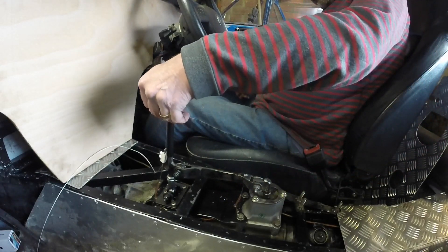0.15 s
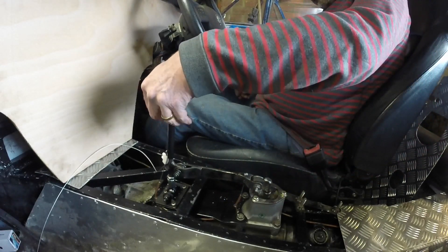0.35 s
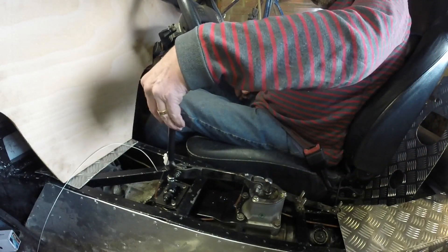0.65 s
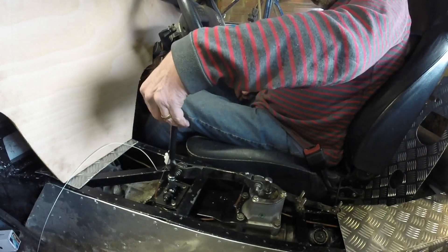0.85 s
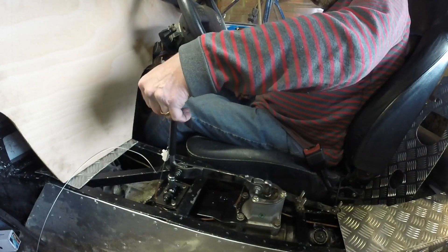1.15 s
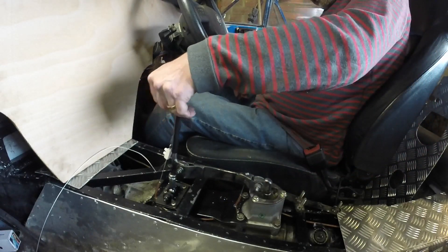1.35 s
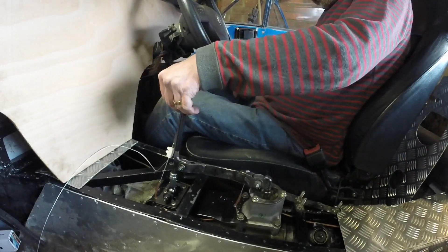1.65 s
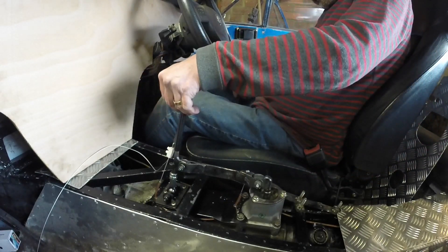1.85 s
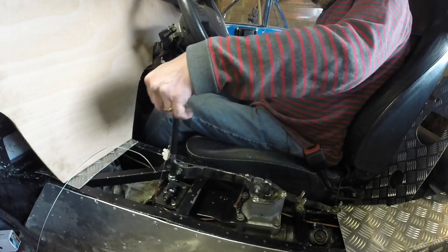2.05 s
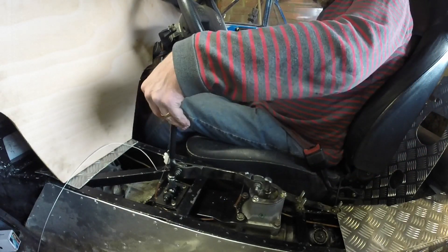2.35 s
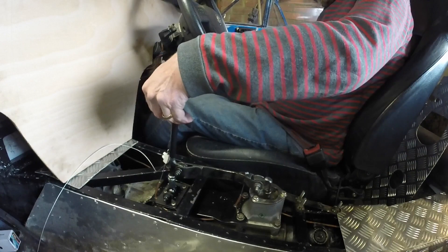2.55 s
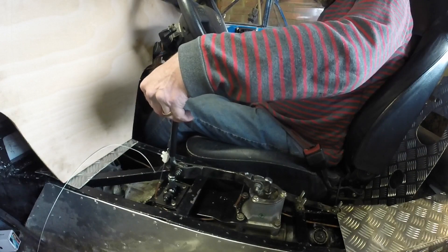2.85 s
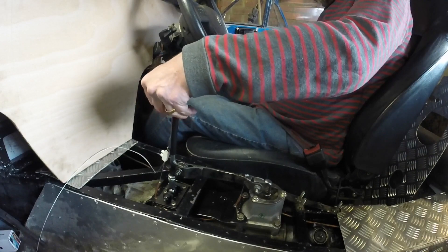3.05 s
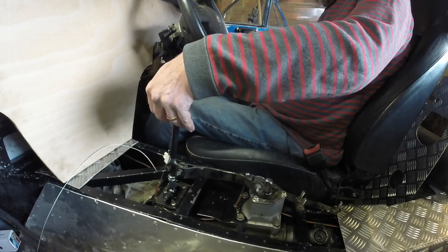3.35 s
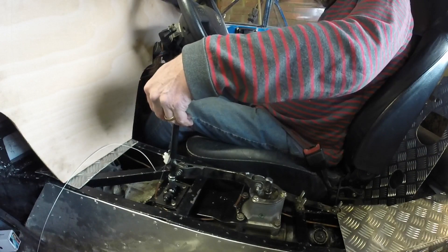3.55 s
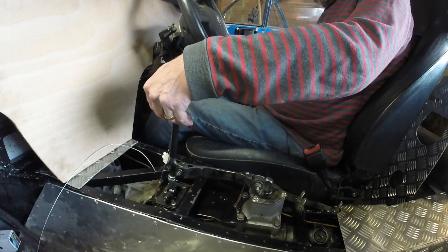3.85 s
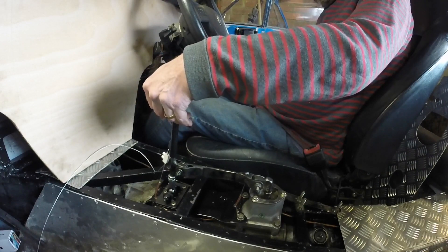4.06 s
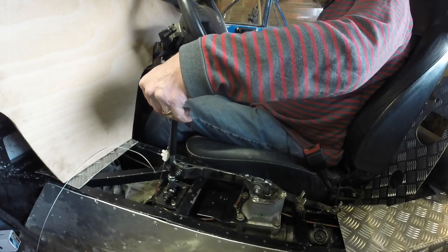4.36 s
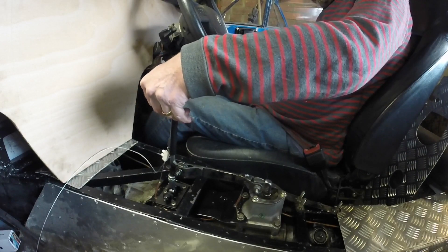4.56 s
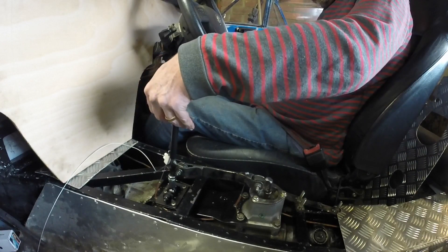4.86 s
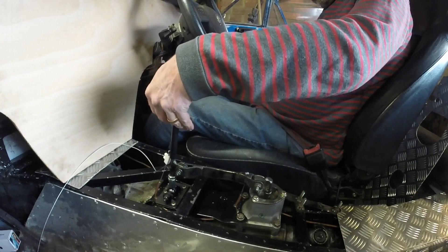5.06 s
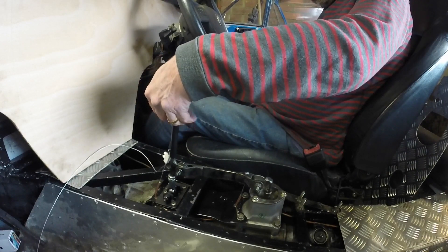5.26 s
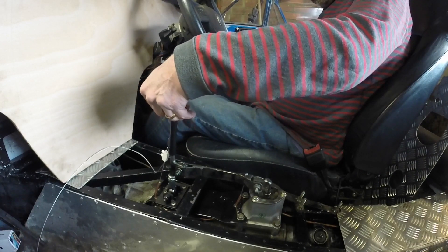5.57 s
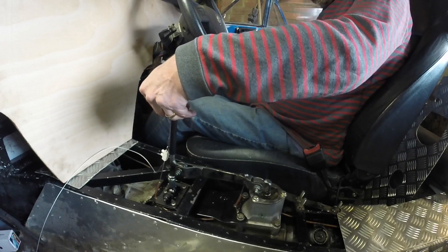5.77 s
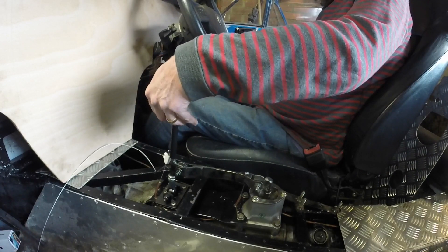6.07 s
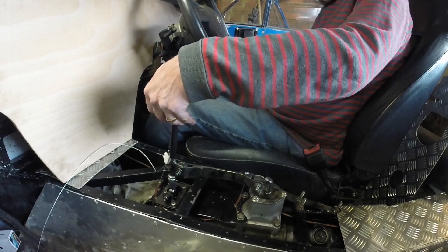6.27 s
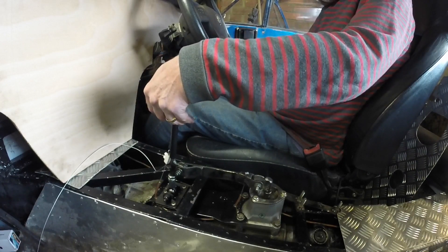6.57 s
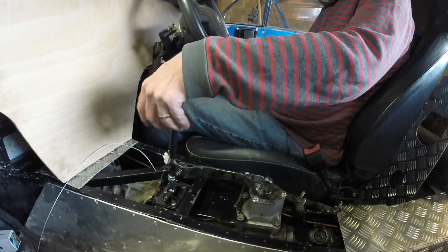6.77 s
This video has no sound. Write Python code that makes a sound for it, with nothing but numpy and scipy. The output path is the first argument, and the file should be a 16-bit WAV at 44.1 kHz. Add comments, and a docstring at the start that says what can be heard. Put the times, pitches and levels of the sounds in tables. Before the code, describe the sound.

A gear lever is worked by hand inside a stripped car body with the engine off. A sharp clack opens, then the lever goes into gear five times, each with a dull knock and a low boom from the metal floor. Between shifts, the rod scrapes briefly and loose steel joints click and tap. The sound is close, in a quiet workshop with a short echo.

```python
"""Gear lever in a bare car body

A gear lever is worked through its gate in a stripped car body that stands, engine off, in a workshop.
Friction sounds as the rod slides in its bushes; loose joints click and the lever clacks on its stops.
Each gear goes home with a thud that excites the modes of the bare floor pan and sets it booming."""
import sys
import numpy as np
from scipy import signal
from scipy.fft import rfft, irfft
from scipy.io import wavfile

SR = 44100
rng = np.random.default_rng(int(sys.argv[2]) if len(sys.argv) > 2 else 0)


def inscribe(sig):
    """Save sig as 16-bit PCM at rate SR to the path in sys.argv[1].

    A 1-D sig is mono; a 2-D sig holds one channel per row.
    Samples are clipped to [-1, 1] before scaling.
    """
    pcm = np.round(np.clip(np.atleast_2d(sig).T, -1, 1) * 32767)
    wavfile.write(sys.argv[1], SR, pcm.astype(np.int16))


N = 305127
AGE = np.arange(SR) / SR   # seconds since a contact


def from_db(db):
    """Amplitude ratio of a level in decibels."""
    return 10 ** (np.asarray(db) / 20)


def at_hz(points, hz):
    """Interpolation on a logarithmic frequency axis."""
    known_hz, values = np.transpose(points)
    return np.interp(np.log(np.maximum(hz, 1)), np.log(known_hz), values)


def decay(t60):
    """Exponential damping: 60 dB are lost in t60 seconds."""
    return np.exp(-np.log(1000) * AGE / max(t60, 1e-3))


def noise(colour, size, tilt=0, peak_hz=1000, peak_db=0, octaves=0.31):
    """Spectral shaping: noise of rms 1 with a colour, a tilt in dB/octave and one broad resonance."""
    hz = np.maximum(np.fft.rfftfreq(size, 1 / SR), 1)
    slope = tilt * np.log2(np.maximum(hz, 300))
    resonance = peak_db / (1 + (np.log2(hz / peak_hz) / octaves) ** 2)
    bass_rolloff = np.minimum(hz / colour[0][0], 1) ** 2
    gain = from_db(at_hz(colour, hz) + slope + resonance) * bass_rolloff
    x = irfft(rfft(rng.standard_normal(size)) * gain, size)
    return x / x.std()


def add(track, s, sound):
    """Superposition: a sound joins the track at s seconds."""
    start = max(round(s * SR), 0)
    track[start:start + len(sound)] += sound[:max(N - start, 0)]


def ring(modes, sign=1):
    """Free vibration of steel: each blow shares its energy among the modes a little differently."""
    scatter_db = rng.normal(0, 1, len(modes))
    return sum(sign ** k * from_db(db + scatter_db[k]) * decay(t60) * np.sin(2 * np.pi * hz * AGE)
               for k, (hz, db, t60) in enumerate(modes))


# Spectral density of the background: f/Hz, level/dB
HUSH_SPECTRUM = [(12, -53.5), (20, -11.5), (53, -0.5), (110, -7), (163, -11.5), (248, -14.5), (285, -14),
                 (319, -17), (485, -16.5), (527, -19.5), (607, -17), (1370, -25), (1910, -25),
                 (13200, -46.5), (16000, -68)]

def workshop_hush():
    """Stationary random noise, strongest in the bass."""
    return from_db(-53) * noise(HUSH_SPECTRUM, N)


# Reverberation time of the workshop: f/Hz, T60/s
REVERB_TIMES = [(150, .4), (600, .36), (2500, .29), (4200, .23), (6000, .21), (14000, .13)]

def workshop_reverb(x, build_s):
    """Reverberation: a diffuse field of reflections builds up and dies away, the treble first."""
    edges = np.geomspace(100, 16000, 9)
    tail = 0
    for low, high in zip(edges, edges[1:]):
        bandpass = signal.butter(2, [low, high], "band", fs=SR, output="sos")
        band = signal.sosfilt(bandpass, rng.standard_normal(SR))
        tail += band * decay(at_hz(REVERB_TIMES, np.sqrt(low * high)))
    tail *= 1 - np.exp(-AGE / build_s)
    return signal.fftconvolve(x, tail / np.linalg.norm(tail))[:N]


# Bending modes of the rod: f/Hz, level/dB, T60/s
ROD_MODES = [(2280, -16, .12), (2450, -17, .12), (2945, 2, .09), (3165, -3, .09), (3245, -4, .08),
             (3425, -6, .1), (3660, -7, .06), (3838, -1, .07), (4151, -10, .05), (4640, -9, .06),
             (5927, -20, .04), (6648, -14, .05), (7600, -19, .04)]

def rod_ring():
    """Bending vibration of a long rod: successive modes alternate in sign."""
    return ring(ROD_MODES, sign=-1)


def stick_slip(slips_per_s, grain_db=2.0):
    """Stick-slip friction: tiny uneven slips modulate the amplitude of the rubbing."""
    return from_db(grain_db * np.interp(AGE * slips_per_s, np.arange(SR), rng.standard_normal(SR)))


# Spectral density of the rubbing: f/Hz, level/dB
FRICTION_SPECTRUM = [(120, -5), (400, -6), (900, -1.5), (1500, -3.5), (2300, -3), (3400, 0.5), (4800, -6.5),
                     (5900, -6), (7200, -16.5), (10000, -18), (15000, -29.5)]
# Short moves through the bushes, at greatest speed: t/s, level/dB, tilt/(dB/octave)
SHORT_MOVES = [(0.972, -48, -0.5), (1.157, -38.5, 1.5), (2.29, -41, -2), (2.98, -48.5, -1),
               (3.279, -39, -2.5), (4.26, -55, -.5), (4.36, -49, -1), (5.304, -56, 3), (5.602, -50, 1),
               (5.691, -52.5, 0), (6.49, -59.5, 2), (6.643, -49, -5.5)]
SLIDE_SWELL_S, SLIDE_FADE_S = .012, .019

def rod_slides(gear_moves):
    """Sliding friction: the noise follows the rod's speed and faintly excites its bending modes."""
    moves = [(s, db, SLIDE_SWELL_S, SLIDE_FADE_S, tilt) for s, db, tilt in SHORT_MOVES]
    out = np.zeros(N)
    t = AGE - .5   # seconds from the greatest speed
    for s, db, swell_s, fade_s, tilt in moves + gear_moves:
        speed = np.exp(-np.maximum(-t / swell_s, t / fade_s))
        slips = stick_slip(slips_per_s=600)
        rub = noise(FRICTION_SPECTRUM, SR, tilt) * speed * slips / np.sqrt(np.mean(slips ** 2))
        out += from_db(db) * np.interp(np.arange(N) / SR, s + t, rub, left=0, right=0)
    rod = rod_ring()
    singing = signal.fftconvolve(out, rod / np.linalg.norm(rod))[:N]
    return out + from_db(-28) * singing


# Envelope of one long pull across the gate: t/s, level/dB
DRAG_ENVELOPE = [(2.035, -64), (2.041, -68), (2.049, -46), (2.109, -47.5), (2.157, -36.5), (2.205, -50)]

def rod_drag():
    """Sustained friction: a dull rasp grows with speed, a brighter scrape with its square."""
    times, db = np.transpose(DRAG_ENVELOPE)
    t = times[0] + AGE
    fade = np.exp(-np.maximum(t - times[-1], 0) / SLIDE_FADE_S)
    speed = from_db(np.interp(t, times, db - db.max())) * fade
    slips = stick_slip(slips_per_s=400)
    rasp = from_db(-3) * speed * noise(FRICTION_SPECTRUM, SR, tilt=-5, peak_hz=2500, peak_db=5)
    scrape = from_db(.5) * speed ** 2 * noise(FRICTION_SPECTRUM, SR)
    out = np.zeros(N)
    add(out, times[0], from_db(db.max()) * slips * (rasp + scrape))
    return out


# Modes of a small steel joint: f/Hz, level/dB, T60/s
JOINT_MODES = [(3530, -17, .05), (5378, -11, .04), (5630, -3, .055), (5743, 0, .065), (5885, -3, .055),
               (6200, -13, .04), (7494, -20, .04), (12250, -30, .04), (13300, -27, .04), (13600, -26, .04),
               (14250, -27, .04)]
# Spectral density of a snap: f/Hz, level/dB
SNAP_SPECTRUM = [(200, -20), (700, -10), (2000, -4), (3500, -2), (4600, -3), (5250, 1), (5750, 9),
                 (6700, -6), (9000, -10), (12000, -17), (14000, -15), (16000, -35)]
# Snaps of the joint: t/s, level/dB, ring level/dB
JOINT_SNAPS = [(0.4572, -25, -22), (0.5085, -27, -28.5), (2.2398, -36, -37), (2.6443, -46, -69),
               (2.678, -34, -34), (3.1697, -50.5, -66), (3.2753, -50, -39), (3.282, -47.5, -46),
               (6.8102, -45.5, -68), (6.8772, -27, -23)]

def joint_clicks(bounce_s=.0045, bounce_db=-7, firm_db=-34):
    """Backlash: a loose joint snaps across its play, bounces once and rings high."""
    envelope = decay(.02) + from_db(-11) * decay(.08)
    out = np.zeros(N)
    for s, db, ring_db in JOINT_SNAPS:
        tilt = .06 * (firm_db - db)   # dB/octave; weaker snaps are thinner
        for lag_s, gain_db in [(0, 0), (bounce_s, bounce_db)]:
            snap = from_db(db + gain_db) * noise(SNAP_SPECTRUM, SR, tilt) * envelope
            add(out, s + lag_s, snap + from_db(ring_db + 2 * gain_db) * ring(JOINT_MODES))
    return out


MID_PART_HZ, SOFT_CUTOFF_HZ = 2960, 420   # resonance of a middle-sized part; bandwidth of a light push
ROD_RING_DB = -15.5   # relative to a tap or knock

def tap(s, db, part_hz, part_db):
    """Size scaling: the smaller the struck part, the brighter and shorter its sound."""
    octaves = np.log2(part_hz / MID_PART_HZ)
    tilt, t60 = 3.4 * octaves, .08 * .79 ** octaves
    return s, db, tilt, t60, part_hz, part_db, db + ROD_RING_DB


# Parts of the linkage tap each other: t/s, level/dB, resonance f/Hz, resonance height/dB
LINKAGE_TAPS = [(0.4204, -42, 5900, 5), (0.975, -53, 1100, 9), (1.1509, -38, 5170, 7),
                (1.325, -51.5, 4500, 20), (1.44, -45, 3560, 2), (1.474, -35.5, 6000, -3),
                (1.499, -28.5, 330, -2), (2.0491, -44.5, 1300, -2), (2.163, -39, 700, 4),
                (2.2152, -38.5, 940, 13), (2.239, -36, 3800, 21), (2.679, -39.5, 1950, 9),
                (3.518, -53.5, 5800, 6), (3.539, -53.5, 4000, 6), (4.354, -58, 2270, 22),
                (5.324, -47.5, 3200, 6), (5.6013, -43, 5400, 1), (6.6444, -55.5, 2980, 3),
                (6.9025, -41.5, 760, 11)]

def linkage_taps(boom_db=8.5, boom_db_per_octave=-1.6):
    """Structure-borne sound: each tap also pushes on the floor pan, a smaller part more weakly."""
    contacts = [tap(*row) for row in LINKAGE_TAPS]
    pushes = [(s, db + boom_db + boom_db_per_octave * np.log2(hz / MID_PART_HZ), SOFT_CUTOFF_HZ)
              for s, db, hz, _ in LINKAGE_TAPS]
    return contacts, pushes


# The lever leans on the side of the gate: t/s, boom level/dB
GATE_BUMPS = [(1.15, -25), (1.359, -16), (2.97, -29.5), (3.273, -31), (4.352, -32), (5.679, -28.5)]

def gate_bumps():
    """Soft impact: a low-frequency push on the floor pan, with only a faint, dull tap."""
    contacts = [tap(s, db - 29, part_hz=890, part_db=13) for s, db in GATE_BUMPS]
    pushes = [(s, db, SOFT_CUTOFF_HZ) for s, db in GATE_BUMPS]
    return contacts, pushes


# The lever hits a hard stop: t/s, level/dB, T60/s, resonance f/Hz, resonance height/dB,
# dulling per rebound/(dB/octave), rod ring level/dB, boom level/dB
HARD_STOPS = [(0.1021, -18.5, 0.021, 3500, 14.5, 0.1, -24.5, -18),
              (1.4868, -21.5, 0.056, 2220, 11, 1.4, -29, -22.5),
              (2.3099, -26.5, 0.038, 2470, 6, 1.3, -44, -30)]

def stop_chatter(first_gap_s=.0026, boom_lag_s=.0041, cutoff_hz=1495):
    """Inelastic rebound: each contact is weaker and duller than the last, and dies more slowly."""
    contacts, pushes = [], []
    for s, db, t60, stop_hz, stop_db, dulling, ring_db, boom_db in HARD_STOPS:
        pushes.append((s + boom_lag_s, boom_db, cutoff_hz))
        for k in range(4):
            loss_db, tilt = 3 * k, .5 - dulling * k
            contacts.append((s, db - loss_db, tilt, t60 * 1.39 ** k,
                             stop_hz, stop_db, ring_db - 2 * loss_db))
            s += first_gap_s * 1.6 ** k
    return contacts, pushes


# A gear goes home: t/s, boom level/dB, contact cut-off f/Hz, rubbing level/dB, knock level/dB,
# knock resonance f/Hz
GEAR_SHIFTS = [(0.4212, -9, 506, -43, -50, 420), (2.3087, 0, 1170, -34.5, -35, 573),
               (3.4579, 0, 785, -37, -37, 422), (4.7268, -2, 480, -33, -38, 840),
               (6.0182, -5, 214, -41.5, -36, 420)]
KNOCK_LAG_S, KNOCK_T60_S, KNOCK_PEAK_DB = .006, .15, 15.5

def gear_seating(fastest_s=.002, swell_s=.0105, fade_s=.013, rub_tilt=.3, knock_tilt=-5):
    """Cushioned impact: the rod slides home, pushes on the pan, and the selector seats with a knock."""
    contacts, pushes, moves = [], [], []
    for s, boom_db, cutoff_hz, rub_db, knock_db, knock_hz in GEAR_SHIFTS:
        pushes.append((s, boom_db, cutoff_hz))
        moves.append((s + fastest_s, rub_db, swell_s, fade_s, rub_tilt))
        contacts.append((s + KNOCK_LAG_S, knock_db, knock_tilt, KNOCK_T60_S,
                         knock_hz, KNOCK_PEAK_DB, knock_db + ROD_RING_DB))
    return contacts, pushes, moves


# Spectral density of a clack: f/Hz, level/dB
CLACK_SPECTRUM = [(90, -12), (250, -2.5), (600, -1.5), (1100, -1), (1500, -1.5), (2200, -2), (3700, -3),
                  (4800, -4), (6500, -10), (7600, -10), (8800, -21.5), (11000, -23), (14500, -30.5),
                  (16000, -43)]

def lever_clacks(contacts, rise_s=.00015):
    """Impact of steel on steel: a crack, the struck part's dense modes and the rod's clearer ring."""
    crack = from_db(-5) * decay(.02)
    attack = 1 - np.exp(-AGE / rise_s)
    out = np.zeros(N)
    for s, db, tilt, t60, part_hz, part_db, ring_db in contacts:
        envelope = (decay(t60) + crack) * attack
        clack = from_db(db) * envelope * noise(CLACK_SPECTRUM, SR, tilt, part_hz, part_db)
        add(out, s, clack + from_db(ring_db) * rod_ring())
    return out


# Lowest modes of the floor pan: f/Hz, level/dB, T60/s, polarity
PAN_MODES = [(43.3, -35, 0.96, 1), (54.3, -40.5, 1.0, -1), (80.1, -32.5, 0.75, 1), (97.6, -24, 0.47, 1),
             (105.4, -41, 0.99, -1), (133.5, -13, 0.29, -1), (148, -54, 1.14, 1), (149, -32, 0.63, -1),
             (163.6, -19.5, 0.12, 1), (170.2, -39, .6, -1), (246.2, -41, 0.44, 1), (273.2, -36.5, 0.4, -1),
             (298, -37, 0.4, 1), (323.6, -45.5, 0.34, -1), (415, -31, 0.19, -1)]
# Spectral density of its higher modes, too close to tell apart: f/Hz, level/dB
DENSE_MODE_SPECTRUM = [(200, -8), (280, 3), (410, 2.5), (470, -13), (550, -7.5), (690, 0.5), (790, -23),
                       (890, -2.5), (1100, -6.5), (2500, -45), (6000, -72)]

def floor_pan(pushes):
    """Plate vibration: the contact acts as a low-pass filter, so a softer push gives a duller boom."""
    low_modes = sum(np.sign(polarity) * from_db(db) * decay(t60) * np.sin(2 * np.pi * hz * AGE)
                    for hz, db, t60, polarity in PAN_MODES)
    out = np.zeros(N)
    for s, db, cutoff_hz in pushes:
        dense_modes = from_db(-33.5) * noise(DENSE_MODE_SPECTRUM, SR) * decay(.26)
        cushion = signal.butter(2, cutoff_hz, fs=SR, output="sos")
        add(out, s, from_db(db) * signal.sosfilt(cushion, low_modes + dense_modes))
    return out


def scene():
    """Superposition of the floor pan, the linkage, its reflections and the hush of the workshop."""
    taps, tap_pushes = linkage_taps()
    bumps, bump_pushes = gate_bumps()
    stops, stop_pushes = stop_chatter()
    knocks, gear_pushes, gear_moves = gear_seating()
    clacks = lever_clacks(stops + knocks + taps + bumps)
    clicks = joint_clicks()
    slides = rod_slides(gear_moves) + rod_drag()
    into_room = from_db(-15.5) * clacks + from_db(-12) * clicks + from_db(-13.5) * slides
    room = workshop_reverb(into_room, build_s=.0021)
    hush = workshop_hush()
    boom = floor_pan(gear_pushes + stop_pushes + bump_pushes + tap_pushes)
    return (hush + room + slides + clicks + clacks + boom)[None]


def record(dry, cutoff_hz=15100):
    """Band limiting: a steep low-pass filter removes the highest treble."""
    return signal.sosfilt(signal.ellip(10, .1, 80, cutoff_hz, fs=SR, output="sos"), dry)


dry = scene()
out = record(dry)
inscribe(out)
```